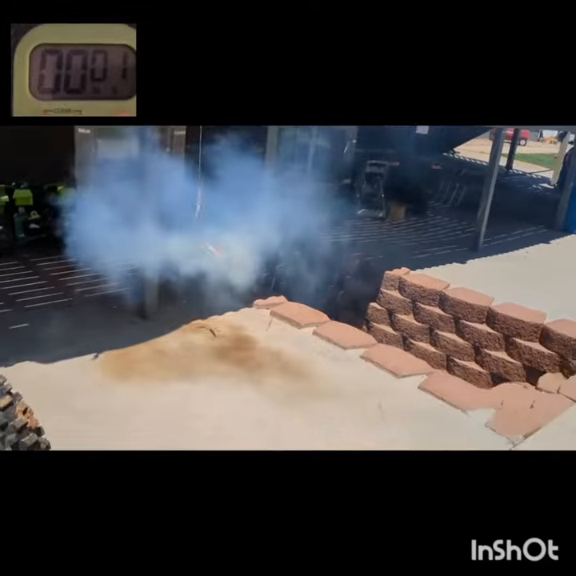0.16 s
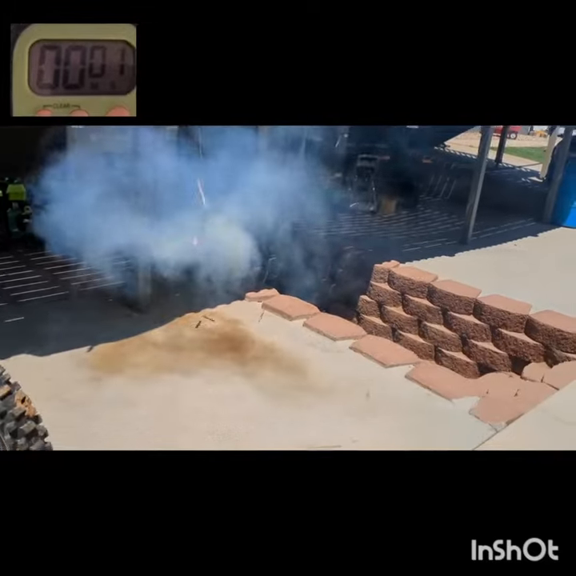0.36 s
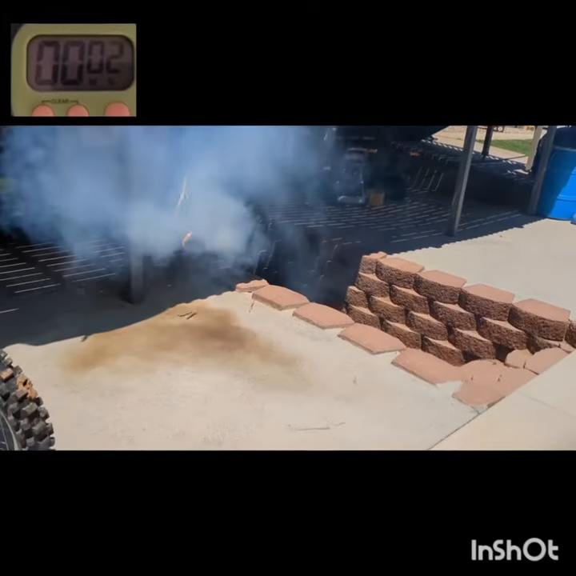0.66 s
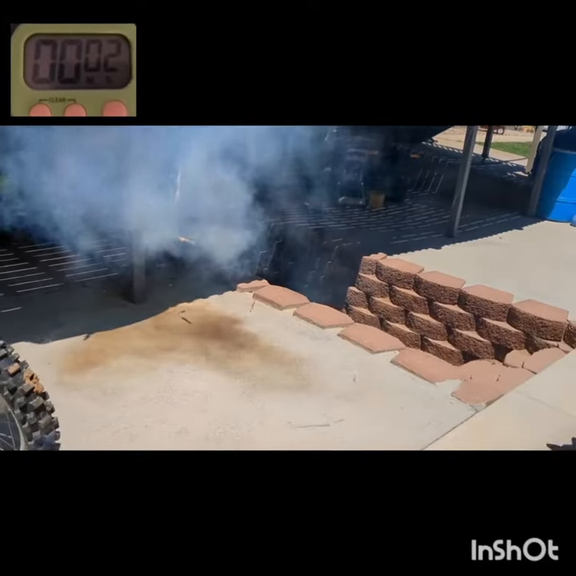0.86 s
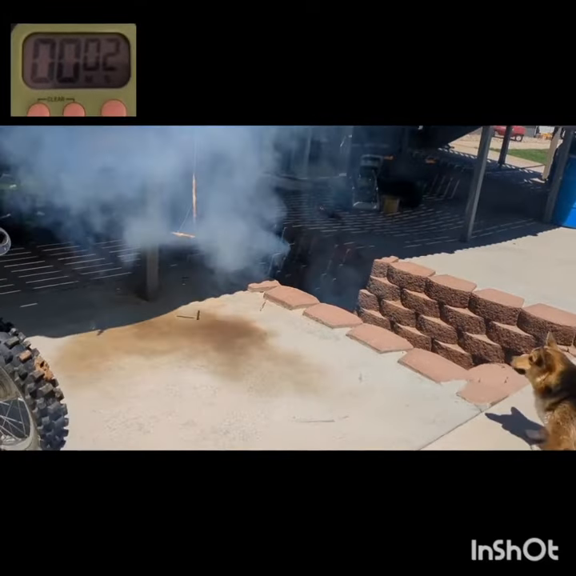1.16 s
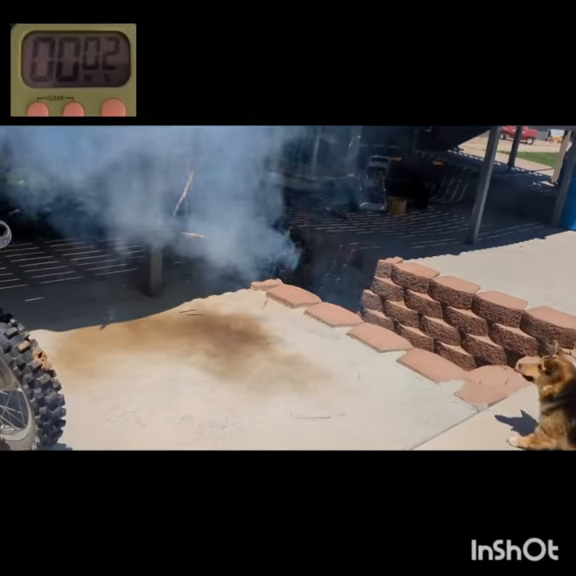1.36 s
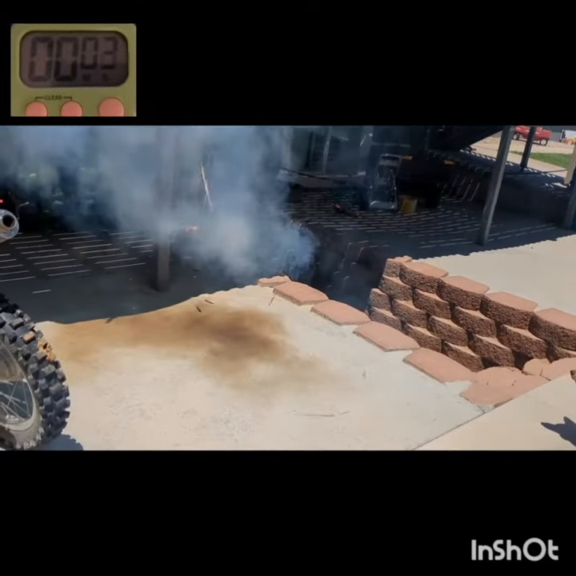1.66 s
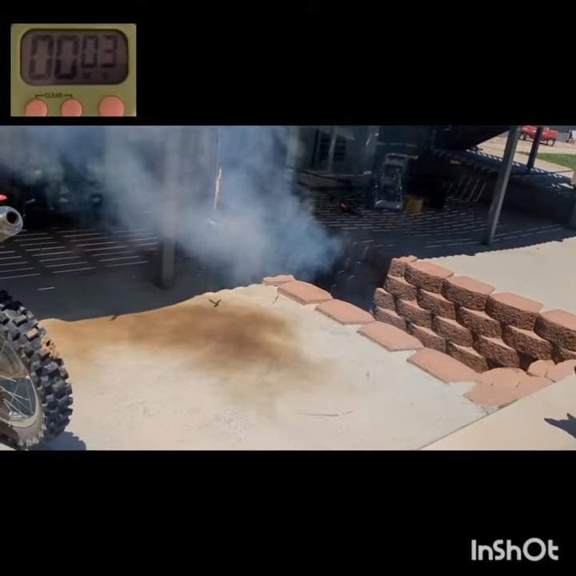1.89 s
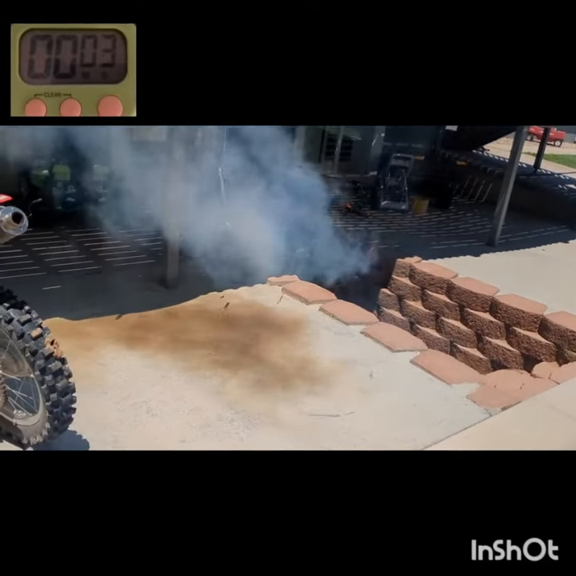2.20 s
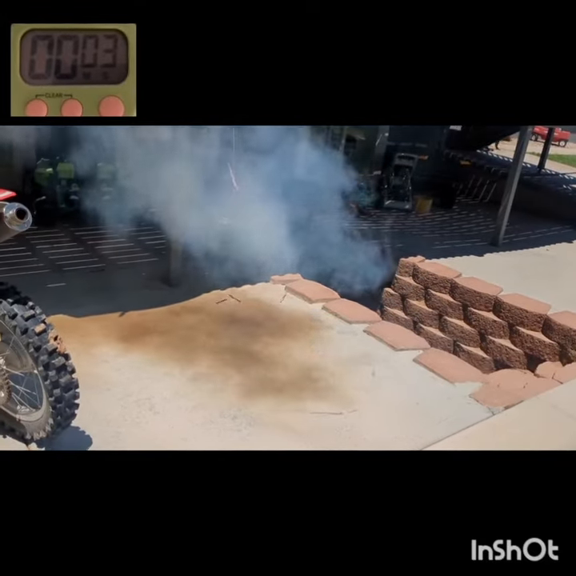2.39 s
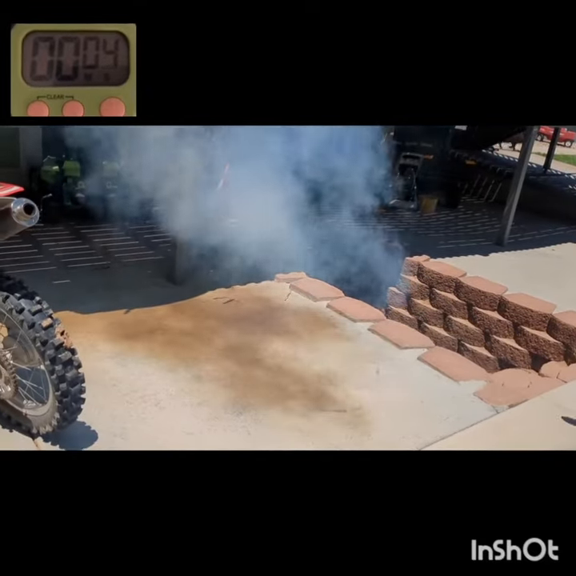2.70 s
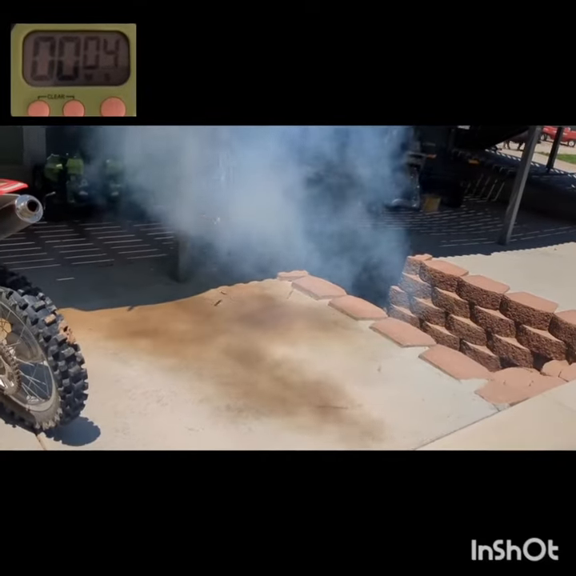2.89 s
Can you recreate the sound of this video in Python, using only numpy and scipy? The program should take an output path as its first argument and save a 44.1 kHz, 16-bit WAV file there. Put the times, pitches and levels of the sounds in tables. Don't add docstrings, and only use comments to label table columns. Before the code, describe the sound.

A burning firework gives a piercing, ragged whistle that steadily sinks in pitch outdoors

```python
import sys
import numpy as np
from scipy import signal
from scipy.fft import rfft, irfft, next_fast_len
from scipy.io import wavfile
from scipy.ndimage import uniform_filter1d, minimum_filter1d, map_coordinates

SR = 44100
rng = np.random.default_rng(int(sys.argv[2]) if len(sys.argv) > 2 else 0)


def amplitude_ratio(level_db):
    exponent = np.asarray(level_db, float) / 20
    return 10 ** exponent


def store_pcm(level_fs):
    pcm = np.round(np.clip(level_fs, -1, 1) * 32767).astype(np.int16)
    wavfile.write(sys.argv[1], SR, np.atleast_2d(pcm).T)


N = 134505
TIME = np.arange(N) / SR
TOP_HZ = 15800

# time in [s], pitch in [Hz].
PITCH_FALL = [(0.0, 5590), (0.02, 5700), (0.15, 5200), (0.25, 5360), (0.29, 5258), (0.67, 4860),
              (0.68, 4846), (1.15, 4409), (1.18, 4498), (1.24, 4332), (1.29, 4395), (1.33, 4266),
              (1.63, 4029), (1.66, 4228), (1.72, 4094), (2.43, 3606), (2.63, 3600), (3.05, 3339)]


def unit(x):
    return x / np.sqrt(np.mean(x ** 2) + 1e-20)


def along(points, hz):
    point_hz, values = np.transpose(points)
    return np.interp(np.log(hz + 1), np.log(point_hz + 1), values)


def curve(rows):
    return np.interp(TIME, *np.transpose(rows))


def wobble(rate):
    return map_coordinates(rng.standard_normal(4000), [np.arange(N) * rate / SR])


def filtered(x, response):
    size = next_fast_len(N + 8192)
    return irfft(rfft(x, size) * response(np.fft.rfftfreq(size, 1 / SR)), size)[..., :N]


def rush(spectrum, patchy_db):
    # frequency in [Hz], likeness in [0 to 1].
    likeness = [(60, .85), (200, .96), (400, .8), (800, .9), (1060, .7), (1250, .98), (1700, .96),
                (2500, .6)]
    z = signal.stft(rng.standard_normal((2, N)), nperseg=512)[2]
    patches = uniform_filter1d(rng.standard_normal(z.shape[1:]), 8, 0)
    patches = unit(uniform_filter1d(patches, 6, 1))
    pair = signal.istft(z * amplitude_ratio(patchy_db * patches), nperseg=512)[1][:, :N]

    def shape(hz):
        spread = np.arccos(np.clip(along(likeness, hz), -1, 1)) / 2
        return amplitude_ratio(along(spectrum, hz)) * (hz > 20) * [np.cos(spread), np.sin(spread)]

    mid, side = filtered(pair, shape)
    return unit(np.array([mid + side, mid - side]))


def whistle():
    # time in [s], level in [dB].
    tone_level = [(0, -18.5), (.14, -18.5), (.16, -15), (.24, -10), (.55, -9), (.7, -13.5), (.95, -8),
                  (1.25, -12), (1.6, -13.5), (1.8, -12), (2.1, -16), (2.5, -12), (2.8, -8.5), (3.05, -13)]
    # time in [s], level in [dB].
    half_level = [(0, -68), (.24, -46), (.3, -33.5), (.57, -27.5), (.63, -42), (.68, -29), (.74, -48),
                  (.79, -28), (1.3, -23.5), (1.45, -31.5), (2, -35), (2.3, -37), (2.65, -30.5), (3.05, -29)]
    # multiple of the pitch, level over the tone in [dB].
    overtones = [(1, 2.5), (2, -13), (3, -14), (4, -17.5)]
    # multiple of the pitch, level over the half pitch in [dB].
    halves = [(.5, 0.5), (1.5, -1.5), (2.5, -1), (3.5, 0), (4.5, -10)]
    catch_s, catch_rough = .2, 3.5
    rough = np.where(TIME < catch_s, catch_rough, 1)
    waver = .0015 * wobble(12) + .0085 * wobble(45) + rough * .0035 * wobble(180)
    hz = uniform_filter1d(curve(PITCH_FALL), size=1500) * (1 + waver)
    grit = 0.047
    phase = 2 * np.pi * np.cumsum(hz) / SR + rough * grit * wobble(1100)

    def stack(rows):
        total = np.zeros(N)
        for multiple, db in rows:
            flutter_db = 3.5 * (multiple != 1) * wobble(70)
            total += amplitude_ratio(db + flutter_db) * np.sin(multiple * phase) * (multiple * hz < TOP_HZ)
        return total

    tone = amplitude_ratio(curve(tone_level) + 0.4 * wobble(55)) * stack(overtones)
    settle_s, slip_early, slip_late = .76, .85, .2
    slip = np.where(TIME < settle_s, slip_early, slip_late)
    grip = np.sqrt(1 - slip ** 2) + slip * wobble(320)
    half = grip * amplitude_ratio(curve(half_level) + 2 * wobble(22.39)) * stack(halves)
    return np.sqrt(2) * (tone + half)


def porch(x):
    # frequency in [Hz], time to die by 60 dB in [s].
    decay = [(300, 0.1), (3000, 0.43), (12000, 0.078)]
    even_hz = 120
    hz, t, z = signal.stft(rng.standard_normal((2, SR // 2)), SR, nperseg=256)
    fade_db = -60 * t / along(decay, hz)[:, None]
    tail = rfft(signal.istft(z * amplitude_ratio(fade_db), SR, nperseg=256)[1], SR)
    evened = tail / np.sqrt(uniform_filter1d(np.abs(tail) ** 2, size=even_hz))
    tail = irfft(evened, SR)[:, :SR // 2]
    delayed = np.pad(x, ((0, 0), (130, 0)))
    return signal.fftconvolve(delayed, tail, axes=1)[:, :N]


def hollowed(x):
    centre, width, depth_db = 1.3, .12, -9
    hz, t, z = signal.stft(x, SR, nperseg=512)
    multiple = hz[:, None] / np.interp(t, *np.transpose(PITCH_FALL))
    dip_db = depth_db * np.exp(-((multiple - centre) / width) ** 2)
    return signal.istft(z * amplitude_ratio(dip_db), nperseg=512)[1][:, :N]


def jet():
    # time in [s], level in [dB].
    gas_level = [(0, -23.5), (.1, -25), (.215, -24), (.25, -28), (.45, -26.5), (.57, -26.5), (.72, -30.5),
                 (.78, -38.5), (.85, -29.5), (.93, -31), (1.2, -28), (1.42, -33), (1.62, -33), (1.9, -34.5),
                 (2.3, -35), (2.7, -30), (2.97, -30.5), (3.05, -33.5)]
    # frequency in [Hz], level in [dB per Hz].
    roar_colour = [(300, -16.5), (750, -2.5), (1100, -7.5), (1500, 0), (2300, -1), (4000, -2), (7000, 0),
                   (12000, -23.5)]
    # frequency in [Hz], level in [dB per Hz].
    hiss_colour = [(4500, -45), (7000, -51.5), (10000, 8), (12500, 8), (14000, 11), (15700, 9)]
    gas_db = curve(gas_level)
    sputter_db = 1.7 * wobble(40.18)
    roar = amplitude_ratio(gas_db + sputter_db + 0.23 * wobble(90)) * rush(roar_colour, patchy_db=1.37)
    start_db, grows_db_per_s, follows = -27.5, 1.25, 0.43
    hiss_db = start_db + grows_db_per_s * TIME + follows * (gas_db - gas_db.mean())
    hiss_db = hiss_db + sputter_db + 1.4 * wobble(50) + 3.0 * wobble(330)
    hiss = amplitude_ratio(hiss_db) * rush(hiss_colour, patchy_db=2.0)
    shy = lambda hz: np.array([1 + 0 * hz, amplitude_ratio(-30 * (hz > 6900))])
    return filtered(hollowed(roar + hiss), shy)


def yard():
    # hum frequency in [Hz], level in [dB rms].
    hum_lines = [(118.4, -64)]
    # frequency in [Hz], level in [dB per Hz].
    rumble_colour = [(15, -48), (25, -26), (54, 2), (86, -6), (113, 1.5), (361, 0.5), (500, -2.5),
                     (650, -27), (1100, -120)]
    hum = np.zeros(N)
    for hz, db in hum_lines:
        hum += amplitude_ratio(db + 4 + 0.66 * wobble(9.3)) * np.sin(2 * np.pi * hz * TIME)
    return hum + amplitude_ratio(-54 + .8 * wobble(6.6)) * rush(rumble_colour, patchy_db=1.1)


def chuffs():
    # time in [s], level in [dB], pitch in [Hz].
    stumbles = [
        (0.567, -17.5, 4540),
        (.567, -17.5, 2490),
        (0.669, -23, 2400),
        (.67, -30, 4650),
        (0.836, -32, 4350),
        (1.588, -20, 3705),
        (1.619, -21.5, 3724),
        (2.973, -28, 2914),
    ]
    length_s, width_hz = .005, 200
    out = np.zeros(N)
    for start, db, pitch in stumbles:
        band = lambda hz: 1 / (1 + ((hz - pitch) / width_hz) ** 2)
        air = unit(filtered(rng.standard_normal(N), band))
        out += amplitude_ratio(db) * np.exp(-((TIME - start) / length_s) ** 2) * air
    return out


def scene():
    tube = np.tile(whistle() + chuffs(), (2, 1))
    return tube + amplitude_ratio(-.5) * porch(tube) + jet() + yard()


def muffled_right(x):
    # frequency in [Hz], right port against the left in [dB].
    muffle = [(400, -1), (800, 3), (1300, 1.5), (3400, -3), (5500, -1), (7200, -14.5), (9500, -26.5),
              (15000, -60)]
    # frequency in [Hz], how far the right port is behind in [radians].
    behind = [(0, 0), (300, .1), (900, 2), (1220, 3.05), (1520, 3.2), (1750, 4.5), (3270, 9.6), (16000, 46)]
    late = lambda hz: amplitude_ratio(along(muffle, hz)) * np.exp(-1j * np.interp(hz, *np.transpose(behind)))
    return filtered(x, lambda hz: np.array([1 + 0 * hz, late(hz)]))


def mirrored(x):
    # frequency heard in [Hz], level of the leak in [dB].
    mirror = [(6700, -45), (7300, -11), (8000, -3), (8700, -11), (9300, -45), (10300, -52), (12400, -48),
              (13000, -70)]
    split_hz = 8000
    flipped = x * 2 * np.cos(4 * np.pi * split_hz * TIME)
    leak = lambda hz: amplitude_ratio(along(mirror, hz)) * (hz < 14000) * (hz > 6000)
    return filtered(x, lambda hz: np.sqrt(1 - leak(hz) ** 2)) + filtered(flipped, leak)


def limited(x):
    ceiling_db, look_s, ease_s = -.3, .002, .005
    need = np.minimum(1, amplitude_ratio(ceiling_db) / (np.abs(x).max(0) + 1e-9))
    ease = int(ease_s * SR)
    held = minimum_filter1d(need, int(2 * look_s * SR) + ease)
    return x * uniform_filter1d(held, ease)


def roll_off(x):
    return signal.sosfilt(signal.butter(12, 15720, fs=SR, output="sos"), x)


def record(dry):
    # frequency in [Hz], level in [dB].
    mic_colour = [(9000, 0), (12500, -6.5), (13500, -13.5), (15700, -15.5)]
    x = mirrored(muffled_right(dry))
    x = filtered(x, lambda hz: amplitude_ratio(along(mic_colour, hz)) * (hz < TOP_HZ))
    return roll_off(limited(x))


dry = scene()
out = record(dry)
store_pcm(out)
```